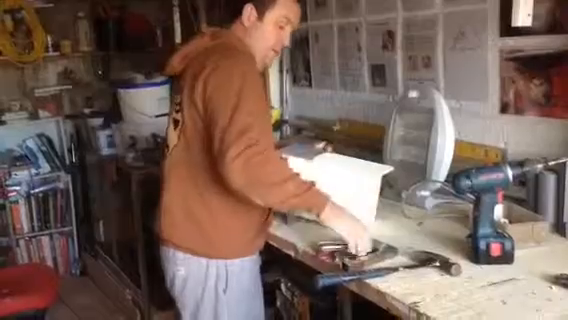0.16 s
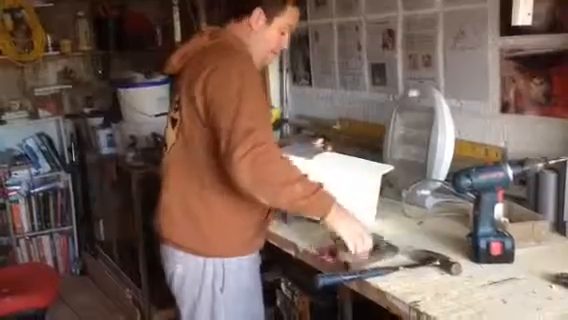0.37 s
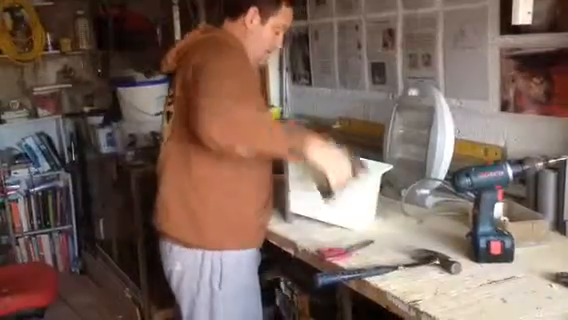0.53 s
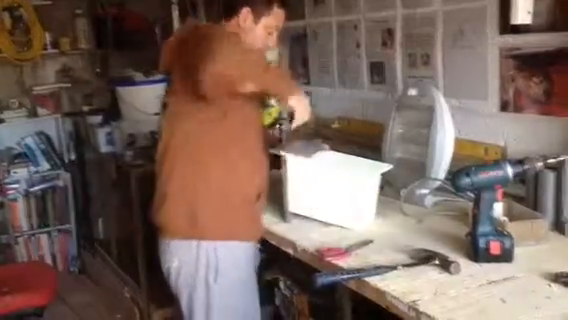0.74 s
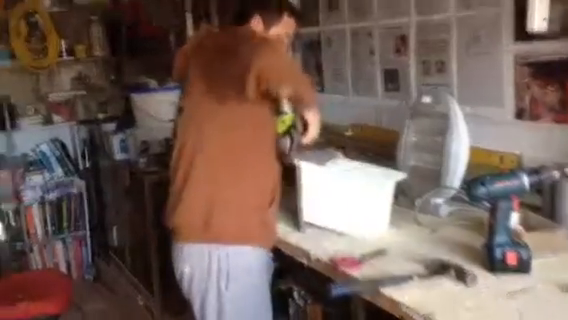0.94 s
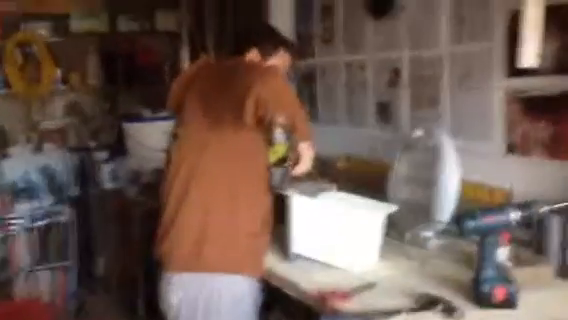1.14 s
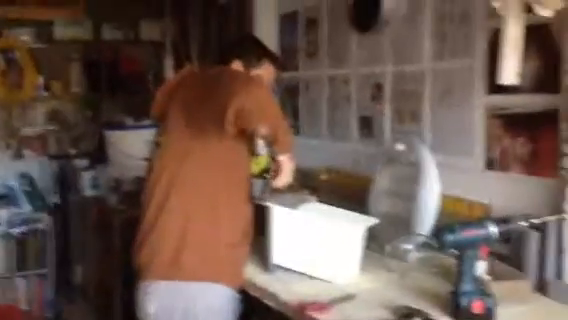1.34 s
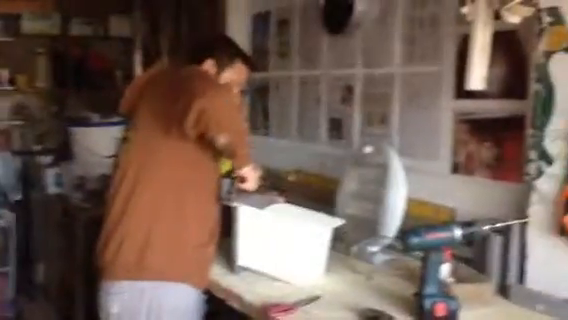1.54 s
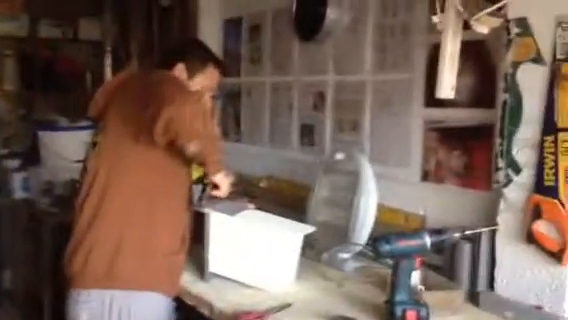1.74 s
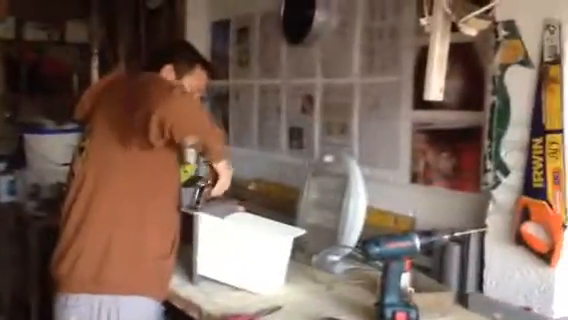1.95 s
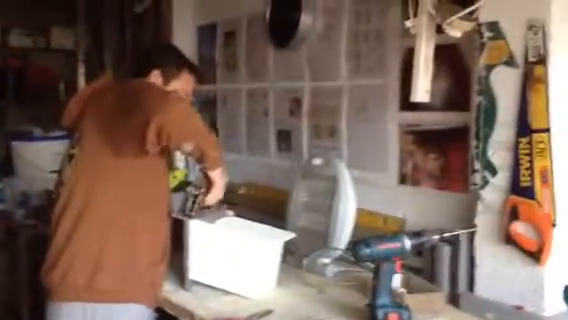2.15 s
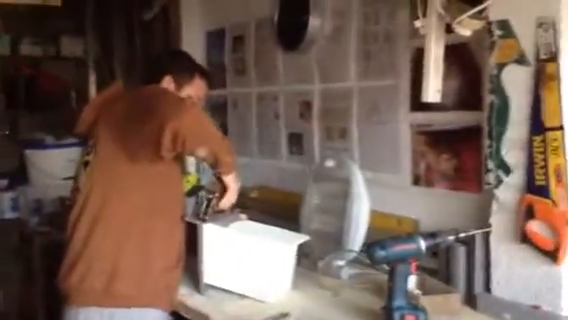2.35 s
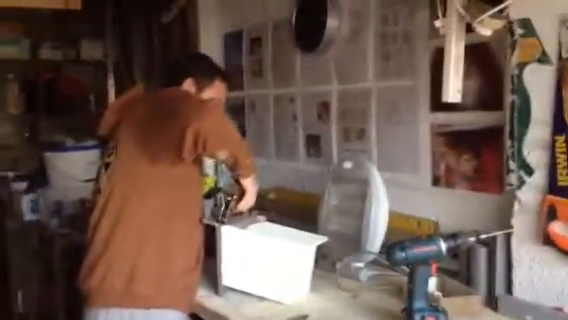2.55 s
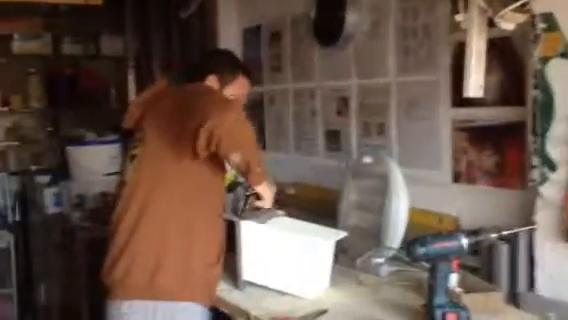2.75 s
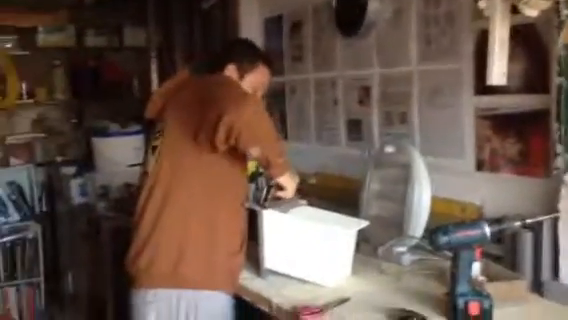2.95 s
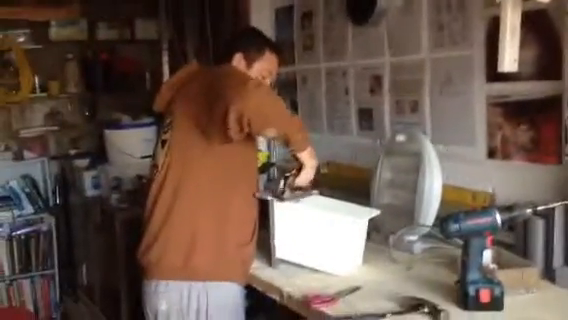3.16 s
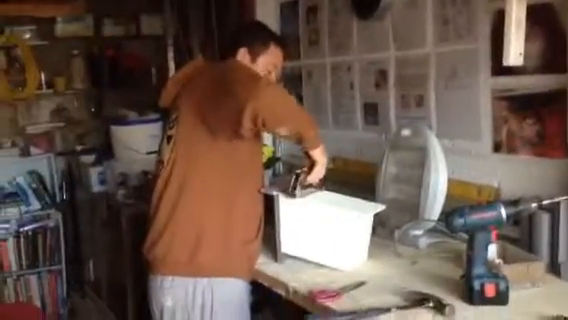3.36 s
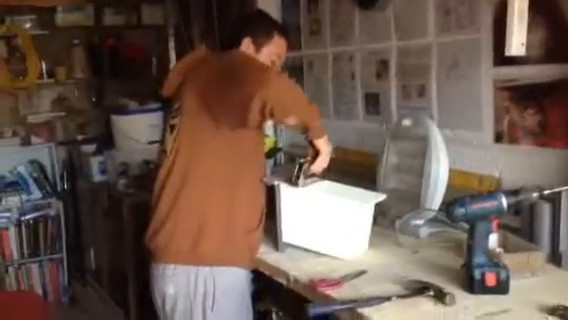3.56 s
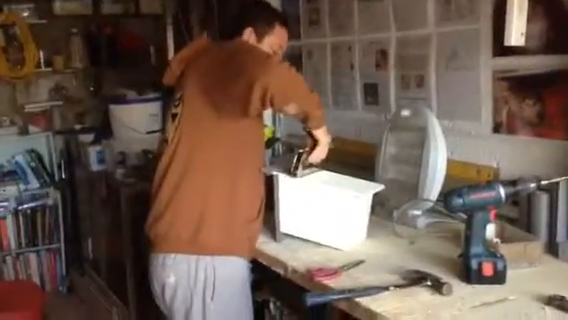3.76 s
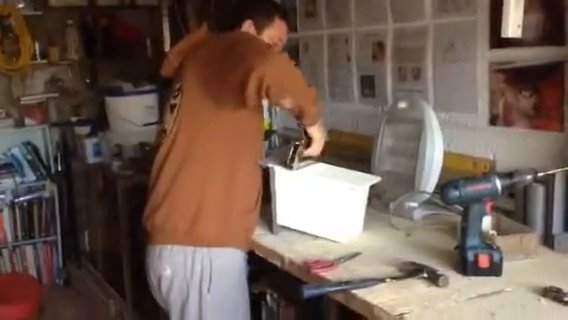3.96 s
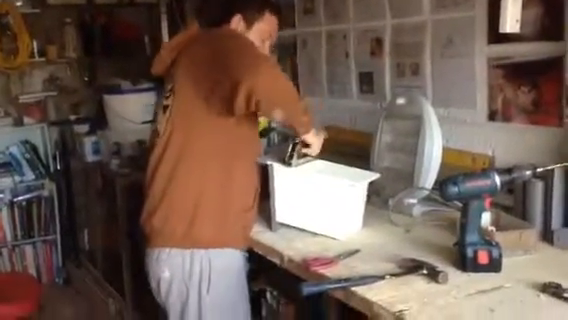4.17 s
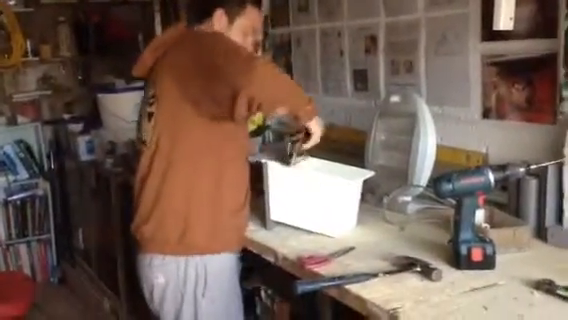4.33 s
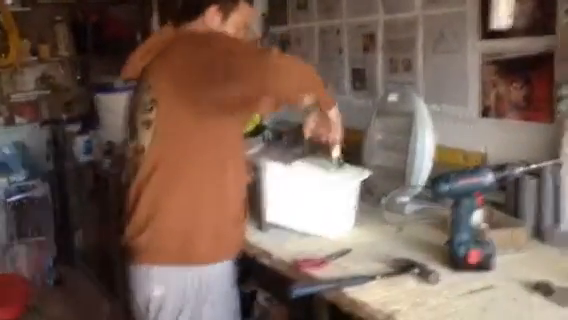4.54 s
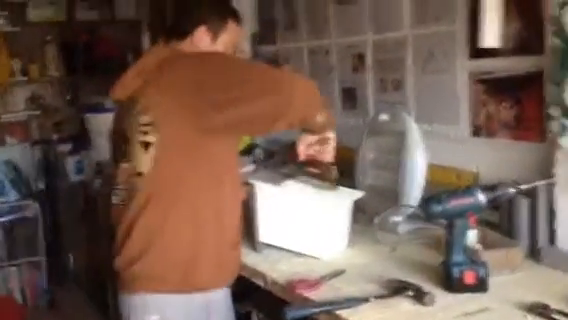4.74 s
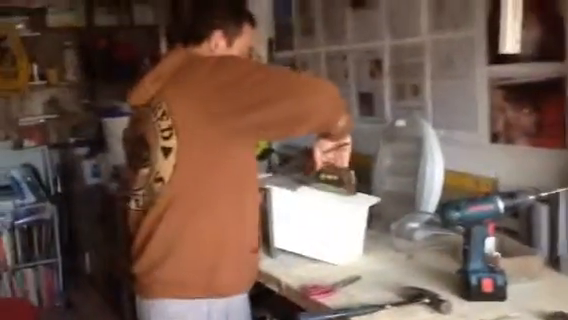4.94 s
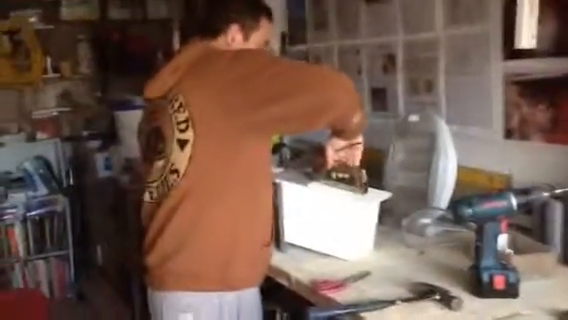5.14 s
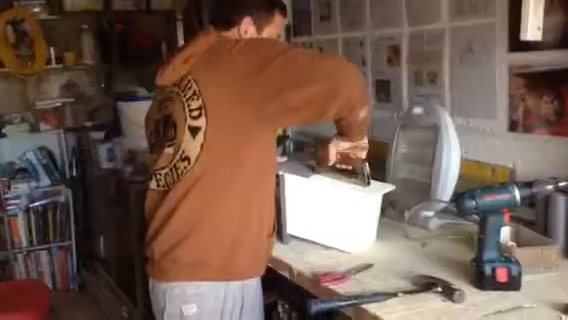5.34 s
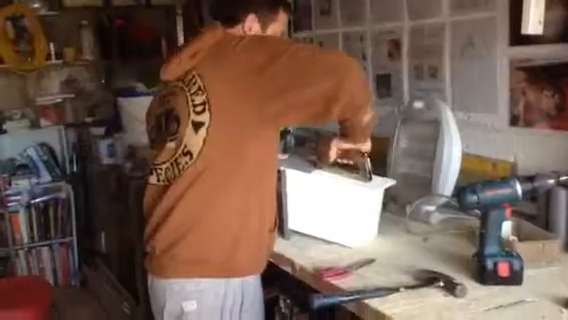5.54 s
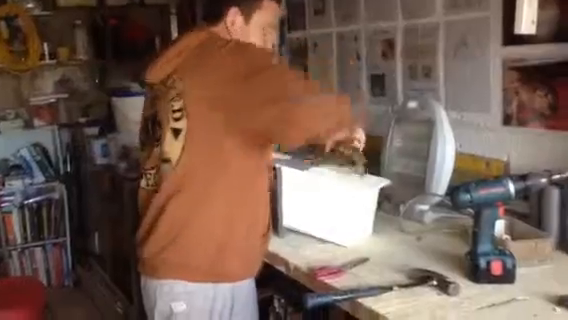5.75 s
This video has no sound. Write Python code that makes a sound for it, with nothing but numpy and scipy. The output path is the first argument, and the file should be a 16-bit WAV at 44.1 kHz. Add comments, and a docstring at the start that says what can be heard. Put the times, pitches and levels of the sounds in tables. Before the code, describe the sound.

A hand staple gun fires four sharp, ringing snaps into a wooden box, with light clicks and knocks between them.

```python
"""Staple gun at the workbench

In a small, cluttered workshop a hand staple gun is dragged off the bench, set on a wooden box and fired
four times. Each squeeze trips a latch, then the driver slams down: the steel frame cracks and rings, the
box thuds, the spring sings on. The handle clicks back, the gun is moved along, a sleeve rustles.
The microphone is a phone close by, and it squashes the peaks."""
import sys
import numpy as np
from scipy import signal
from scipy.fft import rfft, irfft, next_fast_len
from scipy.io import wavfile
from scipy.ndimage import uniform_filter1d

SR = 44100
rng = np.random.default_rng(int(sys.argv[2]) if len(sys.argv) > 2 else 0)


def transcribe(u):
    """Save the signal u as a 16-bit wav file named by the first command-line argument.

    u: samples, shape (n,) or (channels, n), limited to [-1, 1]; the rate is SR.
    q: integer samples, one column per channel.
    """
    v = np.clip(np.atleast_2d(u).T, -1, 1)
    q = np.round(v * 32767).astype(np.int16)
    wavfile.write(sys.argv[1], SR, q)


N = 255730
T = np.arange(int(.6 * SR)) / SR  # seconds within one blow

# Staples fired. Each row: time in seconds, level in dB, trims for box, bench thump and treble in dB,
# box pitch factor, bark in dB and its Hz, clang in dB and its Hz, then latch, spring and effort in dB.
SHOTS = [(1.647, -4.5, -10, -30.5, -2.5, 0.95, 2, 1500, 3.5, 4600, -27, -8, -59.5),
         (2.8703, -4, -11.5, -26.5, -2.5, 0.99, 5.5, 1934, 4, 3500, -27, -7.5, -62.5),
         (4.131, -6, -5, -30, 0.5, 1.03, 6, 1784, 3, 3388, -27.5, -1.5, -58),
         (5.507, -7, -1.5, -26.5, 1, 0.96, 9, 1500, 2.5, 4570, -28, -8, -64)]


def staple(box_db, thump_db, treble_db, pitch, bark_db, bark_hz, clang_db, clang_hz, ring_db):
    """The driver slides free, cracks down, sinks the staple into the box and lands on its stop."""
    slip = undb(-34) * steel(t60=.03, treble_db=treble_db, ring_db=-14.5)
    crack = undb(-7.5) * steel(t60=.046, treble_db=treble_db, ring_db=ring_db)
    stop = undb(-12.5) * steel(t60=.038, treble_db=treble_db - 3, ring_db=ring_db)
    box = undb(box_db - 6) * wood(t60=.04, ring_db=ring_db + 7, pitch=pitch, rise_s=.0011)
    boom = undb(thump_db) * thump()
    blow = together((0, slip), (.002, crack), (.004, box), (.0048, stop), (.005, boom))
    # each shot has its own midrange bark and high steel clang
    return colour(blow, [(1050, 0), (bark_hz, bark_db), (2600, 0), (clang_hz, clang_db), (6300, 0)])


def shots():
    """Each shot reaches the microphone straight, then by way of the walls."""
    out = np.zeros(N)
    for s, db, *contact, _, _, _ in SHOTS:
        direct = staple(*contact, ring_db=-5.5)
        # the gun radiates differently to each side, so the echo is an even wash with little pitch
        echo = sum(workshop(staple(*contact, ring_db=-11.5)) for side in range(3))
        add(out, s - .002, undb(db) * (direct + undb(-12.5) * echo))
    return out


def steel(t60, treble_db, ring_db):
    """Steel meets steel: a bright crack, and the frame rings."""
    # Colour of a steel contact. Each row: frequency in Hz, gain in dB.
    crack_colour = [(30, -31.5), (75, -36), (300, -15), (520, -23), (1000, -9.5), (1500, -3.5), (2500, -3),
                    (3500, -3), (5000, -2), (6200, -6.5), (7800, -1.5), (9000, -6), (12000, -10),
                    (15000, -12.5)]
    # Modes of the frame and handle. Each row: frequency in Hz, relative level in dB, t60 in seconds.
    frame_modes = [(1388, -5.5, 0.061), (1528, -2.5, 0.062), (1805, 1.5, 0.04), (2080, -9.5, 0.13),
                   (2846, -6.5, 0.077), (3310, -3, 0.034), (3159, 3, 0.011), (3720, 9.5, 0.015),
                   (4580, 1, 0.064), (4920, 0.5, 0.031), (5722, -3.5, 0.017), (6630, -7.5, 0.026),
                   (6840, -1.5, 0.019), (7920, 7, 0.053), (9900, -5, 0.027), (11800, -5.5, 0.046),
                   (12950, -8, 0.025)]
    crack = punch(colour(chatter(t60), crack_colour))
    blow = crack + undb(ring_db) * ring(frame_modes)
    return colour(blow, [(4000, .0098), (10000, treble_db)])


def wood(t60, ring_db, pitch=1, rise_s=.00052):
    """A blow into the box: a hollow clack whose pitch depends on the spot."""
    # Colour of a contact on wood. Each row: frequency in Hz at pitch 1, gain in dB.
    clack_colour = [(30, -18), (80, -35), (150, -14.5), (290, -11.5), (410, -7), (600, -8), (880, 7),
                    (1130, -8.5), (1550, -8), (2100, -7), (3000, -14), (6000, -24), (15000, -45.5)]
    # Modes of the box. Each row: frequency in Hz at pitch 1, relative level in dB, t60 in seconds.
    box_modes = [(310, -13, 0.069), (526, -7.5, 0.09), (674, -6, 0.027), (687, -2.5, 0.038),
                 (900.6, 3.5, .05), (956, -1.5, 0.11), (1080, -1.5, 0.027), (1140.6, -6.5, 0.051),
                 (1484, -6.5, 0.037), (1595, -4.5, 0.024)]
    clack = punch(colour(chatter(t60), [(hz * pitch, db) for hz, db in clack_colour]))
    panels = undb(ring_db) * ring(box_modes, pitch, scatter=.0054)
    return (clack + panels) * (1 - np.exp(-T / rise_s))  # the panels take a moment to get going


def thump(pitch=1):
    """The bench top booms under the box."""
    # Modes of the bench. Each row: frequency in Hz at pitch 1, relative level in dB, t60 in seconds.
    bench_modes = [(112, -12, 0.18), (147, -9, 0.098), (178.1, -1, 0.065), (207, 0, 0.092),
                   (270, -6.5, 0.038), (345.6, 1, 0.035)]
    return ring(bench_modes, pitch, scatter=.011) * (1 - np.exp(-T / .0018))


def click(box_db, treble_db, t60):
    """Steel parts grind, meet and rattle once; they reach the box only while the gun is pressed down."""
    grind = undb(-25.5) * steel(t60=.034, treble_db=treble_db, ring_db=-18.5)
    tick = undb(-15.5) * steel(t60=t60, treble_db=treble_db, ring_db=-3.5)
    rattle = undb(-21.5) * steel(t60=.043, treble_db=treble_db, ring_db=-11.5)
    box = undb(box_db - 7) * wood(t60=.0057, ring_db=-6.5)
    boom = undb(box_db - 8.5) * thump()
    direct = together((0, grind), (.005, tick), (.005, box + boom), (.013, rattle))
    return direct + undb(-4.5) * workshop(direct)


def clicks():
    """The latch trips just before each shot; the handle clicks back and rings, and loose parts clink as the gun
    is handled."""
    # Steel contacts: the handle clicking back after a shot, or loose parts clinking as the gun is handled. #
    # Each row: time in seconds, level in dB, box trim in dB, treble in dB.
    contacts = [(0.397, -21.5, -22, 2.5), (0.4859, -37.5, -4, -2), (1.8748, -37, -43.5, -4),
                (1.9658, -39, -32, -3.5), (3.1061, -35, -37, 0), (4.3907, -35.5, -36, -0.5),
                (4.4557, -40.5, -29, 3.5), (4.4783, -40, -27, 4), (4.6449, -44, -30, 4),
                (5.089, -45.5, -7, -7)]
    # Modes of the handle. Each row: frequency in Hz, relative level in dB, t60 in seconds.
    handle_modes = [(1341, -31, 0.12), (3860, -9, 0.022), (4130, -19.5, .08)]
    latch_lead_s, grind_s = .0492, .005
    out = np.zeros(N)
    for s, _, box_db, *_, latch_db, _, _ in SHOTS:
        latch = click(box_db - 1, treble_db=-5, t60=.04)
        add(out, s - latch_lead_s - grind_s, undb(latch_db) * latch)
    for s, db, box_db, treble_db in contacts:
        add(out, s - grind_s, undb(db) * click(box_db, treble_db, t60=.043))
        add(out, s, undb(db) * sing(handle_modes))
    return out


def knocks():
    """The nose of the gun is set down on wood; the hand damps the ring."""
    # Bumps on wood. Each row: time in seconds, level in dB, thump and steel trims in dB, pitch factor.
    bumps = [(0.316, -32.5, -17.5, -7, 0.67), (0.463, -33.5, -10, -29, 0.84), (0.512, -53, -8, -28, 0.68),
             (0.950, -25.5, -5, -1, 1.07), (3.26, -31, -4.5, -8, 0.95), (3.559, -57.5, 5.5, -6, 0.95),
             (3.943, -46, -26, -27, 1.01), (5.138, -29.5, -10, -24, 0.98)]
    out = np.zeros(N)
    for s, db, thump_db, steel_db, pitch in bumps:
        clack = undb(-7.5) * wood(t60=.025, ring_db=-9, pitch=pitch, rise_s=.0011)
        boom = undb(thump_db - 3.5) * thump(pitch)
        nose = undb(steel_db - 9.5) * steel(t60=.03, treble_db=-13, ring_db=-22)
        nose = colour(nose, [(2500, -.5), (7000, -2), (13000, -20)])  # wood cushions the steel
        knock = together((0, clack + nose), (.003, boom))
        knock = colour(knock, [(40, -12), (140, 2.5), (210, 1.5), (400, -1)])
        add(out, s, undb(db) * (knock + undb(-3) * workshop(knock)) * fade(.74))
    return out


def springs():
    """The main spring sings after every shot, the return coil after a jolt."""
    # Modes of the main spring. Each row: frequency in Hz, relative level in dB, t60 in seconds.
    spring_modes = [(2086.3, -53, 1), (2480, -53.5, 0.99), (3270, -49.5, 0.93), (4003, -56.5, .8),
                    (4730, -53, .55)]
    # Modes of the coil. Each row: frequency in Hz at pitch 1, relative level in dB, t60 in seconds.
    coil_modes = [(1376, 6, .27), (4005, 0, 1.1), (4414, 2, .36)]
    # Jolts to the coil, which sings lower while still compressed.
    # Each row: time in seconds, level in dB, pitch factor.
    jolts = [(1.963, -69.5, 1), (3.259, -69.5, .95), (4.457, -67.5, .948), (4.644, -70, 1), (5.692, -64, 1)]
    out = np.zeros(N)
    for s, *_, spring_db, _ in SHOTS:
        add(out, s, undb(spring_db) * sing(spring_modes))
    for s, db, pitch in jolts:
        add(out, s, undb(db) * sing(coil_modes, pitch))
    return out


def drag():
    """Steel scrapes over the bench, louder as it gathers speed, until it lifts off."""
    # Colour of the scrape. Each row: frequency in Hz, gain in dB.
    scrape_colour = [(60, -34), (120, -22), (190, 0.5), (320, -10), (480, 2.5), (620, -13), (820, 0),
                     (1200, -8.5), (1500, -8.5), (2400, -25.5), (5000, -25.5), (15000, -44)]
    start_s, lift_off_s, release_s = .33, .512, .036
    speed = np.interp(np.arange(N) / SR, [start_s, lift_off_s, lift_off_s + release_s], [0, 1, 0])
    return undb(-39) * speed * friction(scrape_colour, grain_db=3.5, uneven_db=4)


def lever():
    """The lever rubs ever harder as it loads the spring, until the driver is let go."""
    # Colour of the rubbing lever. Each row: frequency in Hz, gain in dB.
    rub_colour = [(80, -28), (200, -2.5), (450, 1.5), (1000, 2.5), (1900, -6.5), (2800, -7), (4200, 0.5),
                  (5500, -12), (8000, -8), (15000, -22.5)]
    squeeze_s = .13
    t = np.arange(N) / SR
    force = sum(undb(effort_db) * np.interp(t, [s - squeeze_s, s], [0, 1], right=0)
                for s, *_, effort_db in SHOTS)
    return undb(1) * force * friction(rub_colour, grain_db=3.5, uneven_db=2)


def clothing():
    """Cloth rubs and swishes with each stroke of the arm and each lean on the gun."""
    # Strokes of the arm. Each row: middle and length in seconds, cloth and sleeve swish levels in dB.
    strokes = [(.04, 0.37, -60.5, -64), (0.269, 0.31, -62.5, -66), (0.496, 0.24, -50.5, -76),
               (0.662, .22, -56.5, -60.5), (0.846, .24, -65, -66), (1.139, .52, -65.5, -70),
               (1.46, 0.39, -63.5, -72), (2.278, 0.58, -78, -75.5), (3.268, 0.16, -67.5, -66),
               (4.918, 0.6, -73.5, -74), (5.285, .12, -62.5, -78), (5.452, 0.26, -53, -69),
               (5.658, 0.31, -54, -79), (5.8, .12, -54.5, -71)]
    # Colours of the dull cloth rub and the bright sleeve swish. Each row: frequency in Hz, gain in dB.
    cloth_colour = [(30, -38), (60, -27.5), (115, 2), (200, 3), (380, 0.5), (800, -5), (1700, -9),
                    (2800, -17), (4500, -20), (5500, -29), (8000, -29), (15000, -37.5)]
    swish_colour = [(200, -27), (1500, 1), (3000, -4), (4400, 1.5), (6200, -6.5), (8000, -3.5),
                    (10000, -12), (15000, -10.5)]
    # the body leans in and back around each shot
    leans = [(s, .8, effort_db - 9, effort_db - 14.5) for s, *_, effort_db in SHOTS]
    out = np.zeros(N)
    for s, length_s, cloth_db, swish_db in strokes + leans:
        speed = swell(length_s)
        cloth = undb(cloth_db) * friction(cloth_colour, grain_db=3, uneven_db=1.6, size=len(speed))
        swish = undb(swish_db) * friction(swish_colour, grain_db=3, uneven_db=1.7, size=len(speed))
        add(out, s - length_s / 2, speed * (cloth + swish))
    return out


def squeaks():
    """Something sticks and slips in a short, wavering tone."""
    # Faint squeaks. Each row: start and length in seconds, frequency in Hz, level in dB.
    slips = [(1.313, 0.03, 4550, -67), (2.781, .04, 3620, -65), (5.321, 0.024, 2460, -62)]
    out = np.zeros(N)
    for s, length_s, hz, db in slips:
        grip = swell(length_s)
        wavering_hz = hz * (1 + .029 * walk(360, len(grip)))
        add(out, s, undb(db) * grip * np.sin(2 * np.pi * np.cumsum(wavering_hz) / SR))
    return out


def soft_hiss():
    """A faint, thin hiss near 5 kHz, like a breath or rustle, swells twice."""
    # Swells of the hiss. Each row: middle and length in seconds, level in dB.
    swells = [(2.22, .3, -79), (2.438, 0.25, -77.5)]
    # Colour of the hiss. Each row: frequency in Hz, gain in dB.
    hiss_colour = [(1000, -22), (3800, -13), (5300, 6), (6600, -12), (8500, -8), (15000, -22)]
    out = np.zeros(N)
    for s, length_s, db in swells:
        envelope = swell(length_s)
        hiss = friction(hiss_colour, grain_db=4, uneven_db=1.5, size=len(envelope))
        add(out, s - length_s / 2, undb(db) * envelope * hiss)
    return out


def workshop(x):
    """Walls and shelves scatter a quick echo and a duller one lingers; paths change as the worker moves."""
    early_colour = [(60, -11.5), (150, -1.5), (400, 5), (900, 1.5), (3000, .5), (8000, -2), (15000, -1.5)]
    late_colour = [(70, -8), (160, 10.5), (400, 3), (2000, -3), (4500, -4), (8000, -11.5), (15000, -20)]
    early = colour(chatter(t60=.14), early_colour) * (1 - np.exp(-(T / .006) ** 2))
    late = colour(chatter(t60=.34), late_colour) * (1 - np.exp(-(T / .025) ** 2))
    response = punch(early) + undb(-18.5) * punch(late)
    return signal.fftconvolve(x, response / np.linalg.norm(response))[:len(T)]


def still_air():
    """Faint room tone and microphone hiss."""
    tone = [(30, -22.5), (70, -9.5), (130, -.5), (300, -2.5), (1000, -6.5), (2500, -15.5),
            (4500, -19.5), (8000, -21), (15000, -28.5)]
    return undb(-71.5) * unit(colour(rng.standard_normal(N), tone))


def ring(modes, pitch=1, scatter=.0067):
    """Damped modes; grip and striking point shift them a little each time."""
    tones = np.zeros(len(T))
    for hz, db, t60 in modes:
        level, detune, phase = rng.standard_normal(3)
        cycles = hz * pitch * (1 + scatter * detune) * T + phase
        tones += undb(db + 2 * level) * fade(t60) * np.sin(2 * np.pi * cycles)
    return punch(tones)


def sing(modes, pitch=1):
    """Thin steel rings on in clean tones that come and go as the gun turns in the hand."""
    waver_db = 1.5
    tones = sum(undb(db + waver_db * walk(28, len(T))) * fade(t60) * np.sin(2 * np.pi * hz * pitch * T)
                for hz, db, t60 in modes)
    return tones * (1 - T / T[-1]) ** .5


def friction(points, grain_db, uneven_db, size=N):
    """Countless small slips, a few larger, in uneven surges."""
    slips = rng.standard_normal(size) * undb(grain_db * rng.exponential(size=size).clip(0, 6))
    return unit(colour(slips, points)) * undb(uneven_db * walk(30, size))


def chatter(t60):
    """Dense micro-impacts that die away."""
    return rng.standard_normal(len(T)) * fade(t60)


def fade(t60):
    """Exponential decay, 60 dB in t60 seconds."""
    return np.exp(-np.log(1000) * T / t60)


def swell(length_s):
    """A smooth rise and fall."""
    return signal.windows.hann(int(length_s * SR)) ** .5


def walk(rate_hz, size):
    """Random levels held 1 / rate_hz seconds and slewed; spread near 1."""
    hold = int(SR / rate_hz)
    return uniform_filter1d(np.repeat(rng.standard_normal(size // hold + 1), hold), hold)[:size]


def colour(x, points):
    """Causal filter through (Hz, dB) points, from the cepstrum of the log gain."""
    size = next_fast_len(len(x) // 2 + 2048) * 2
    hz, db = np.transpose(points)
    bin_hz = np.arange(size // 2 + 1) * SR / size
    gain = undb(np.interp(np.log(bin_hz + 1), np.log(hz), db))
    cepstrum = irfft(np.log(gain))
    cepstrum[1:size // 2] *= 2
    cepstrum[size // 2 + 1:] = 0
    return irfft(rfft(x, size) * np.exp(rfft(cepstrum)))[:len(x)]


def undb(db):
    """Decibels to gain."""
    return 10 ** (np.asarray(db) / 20)


def unit(x):
    """Scale to rms 1."""
    return x / np.sqrt(np.mean(x ** 2))


def punch(x):
    """Scale a blow to the energy of 10 ms at rms 1."""
    return x / np.sqrt(np.sum(x ** 2) / (SR / 100))


def together(*parts):
    """One blow from (delay in seconds, sound) parts."""
    return sum(np.pad(x, (int(s * SR), 0))[:len(T)] for s, x in parts)


def add(track, s, x):
    """Mix a sound in at s seconds."""
    i = int(s * SR)
    x, i = x[max(-i, 0):], max(i, 0)
    track[i:i + len(x)] += x[:N - i]


def scene():
    """Everything at the bench, in mono from one spot close by."""
    gun = shots() + lever() + clicks() + knocks() + springs() + drag()
    return (gun + clothing() + soft_hiss() + squeaks() + still_air())[None]


def record(dry):
    """The phone thins the bass, rounds off the loudest peaks and cuts the top."""
    low_cut_hz, top_hz, ceiling = 54, 15400, .48
    thin = signal.sosfilt(signal.butter(2, low_cut_hz, "high", fs=SR, output="sos"), dry)
    squashed = ceiling * np.tanh(thin / ceiling)
    return signal.sosfilt(signal.ellip(10, .2, 80, top_hz, fs=SR, output="sos"), squashed)


dry = scene()
out = record(dry)
transcribe(out)
```